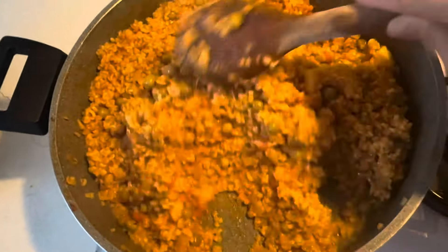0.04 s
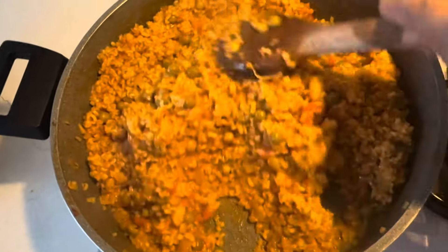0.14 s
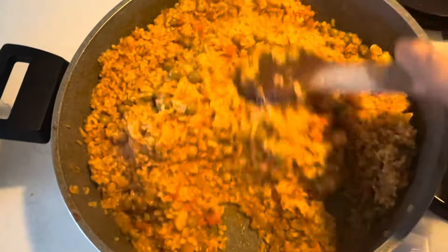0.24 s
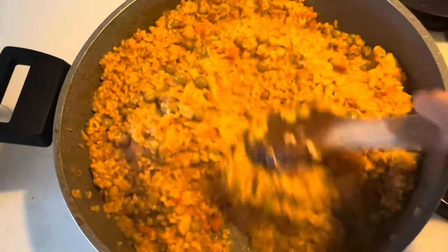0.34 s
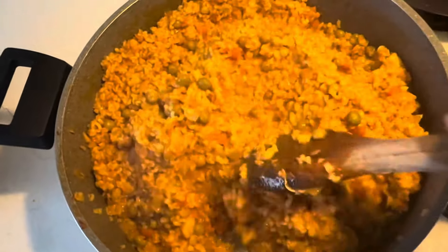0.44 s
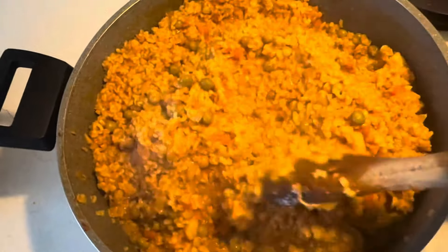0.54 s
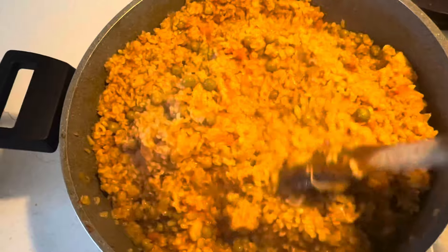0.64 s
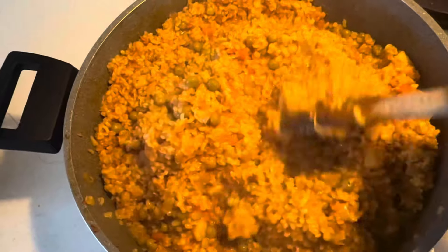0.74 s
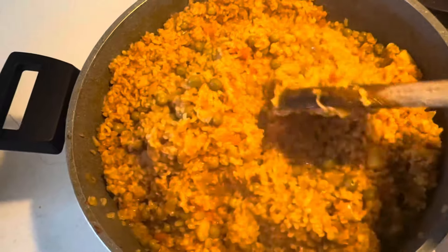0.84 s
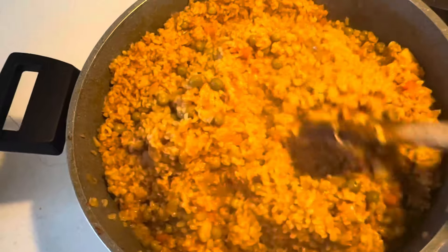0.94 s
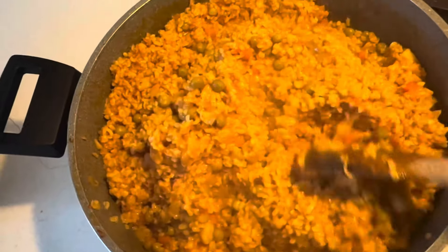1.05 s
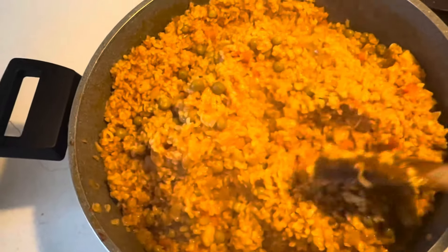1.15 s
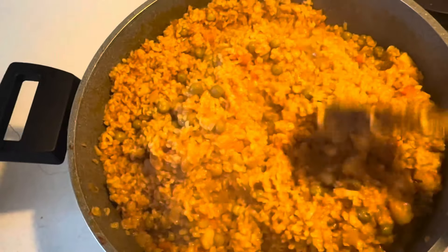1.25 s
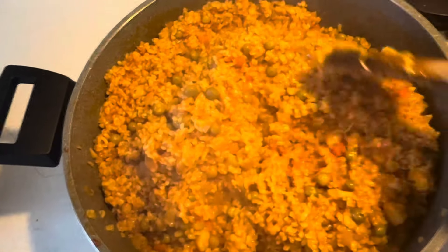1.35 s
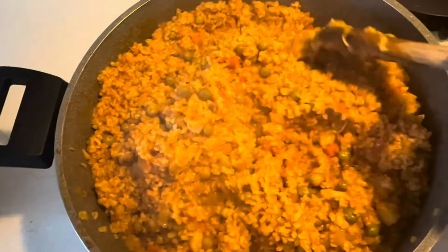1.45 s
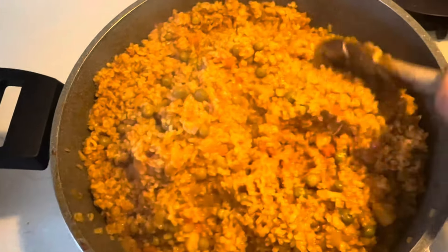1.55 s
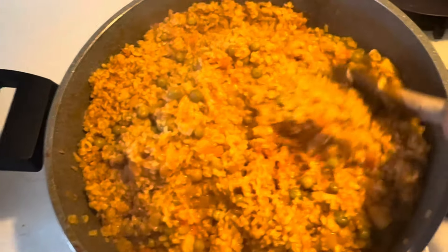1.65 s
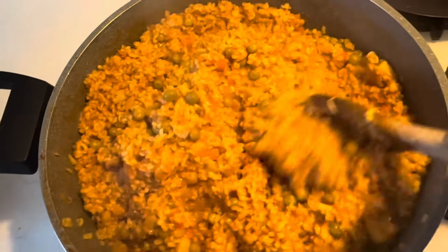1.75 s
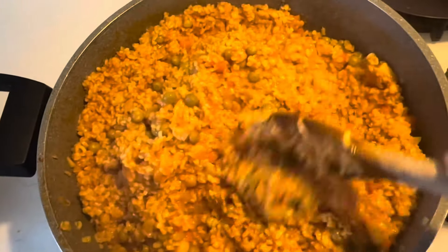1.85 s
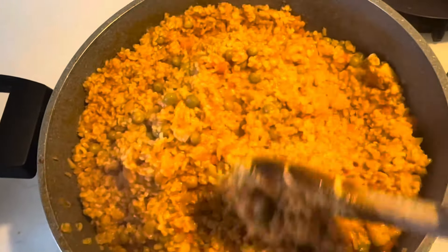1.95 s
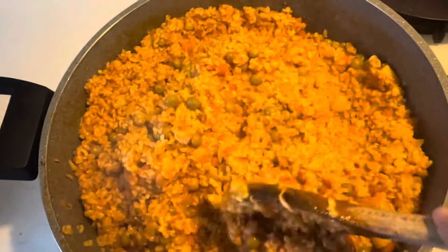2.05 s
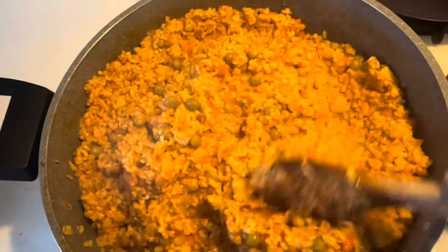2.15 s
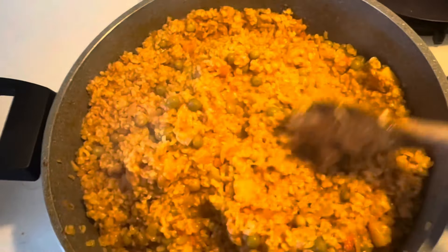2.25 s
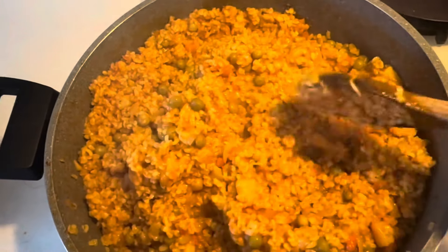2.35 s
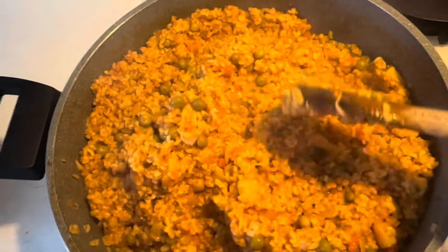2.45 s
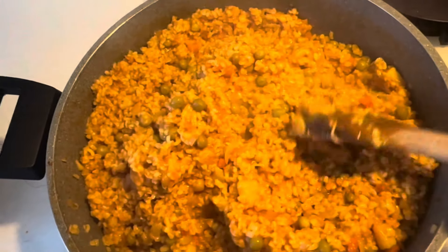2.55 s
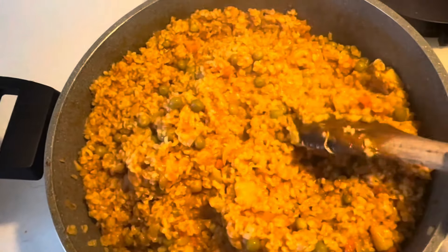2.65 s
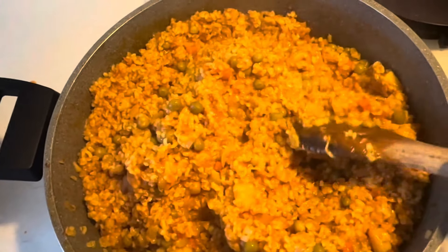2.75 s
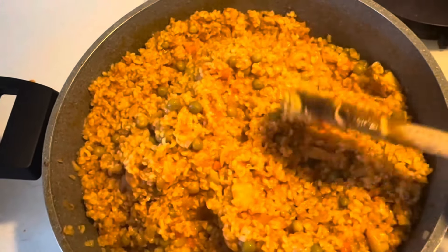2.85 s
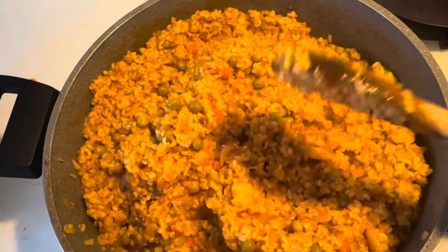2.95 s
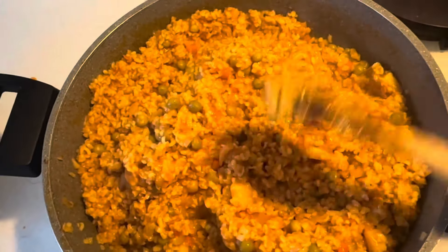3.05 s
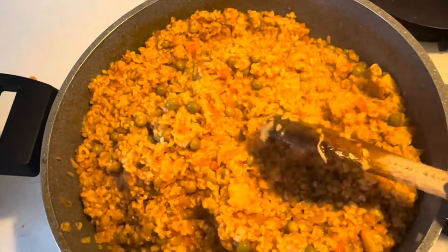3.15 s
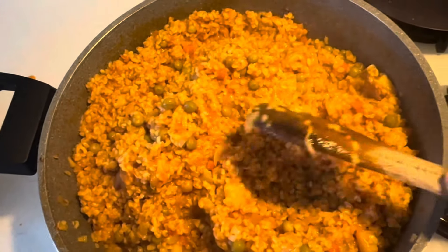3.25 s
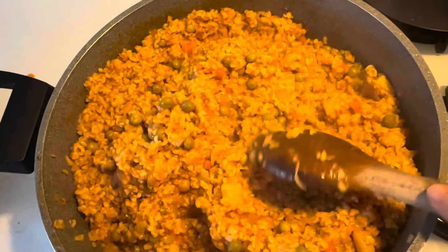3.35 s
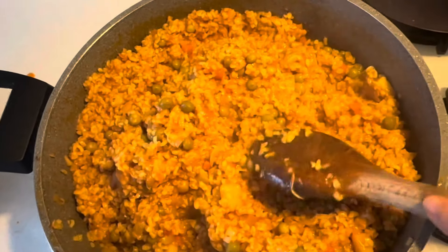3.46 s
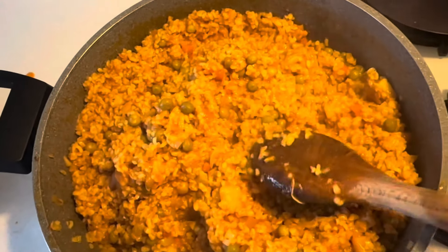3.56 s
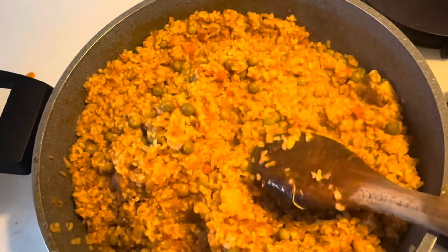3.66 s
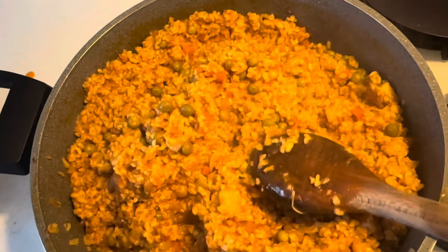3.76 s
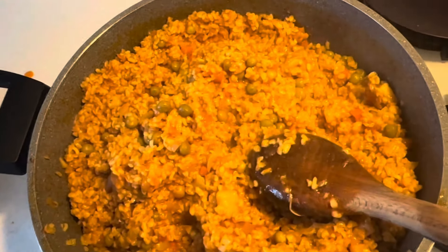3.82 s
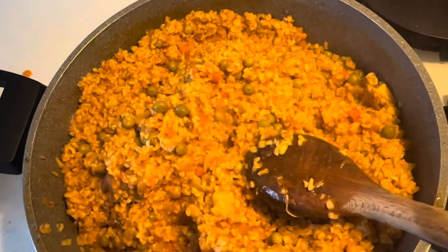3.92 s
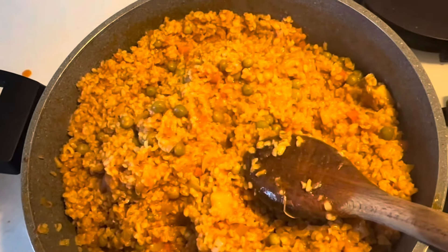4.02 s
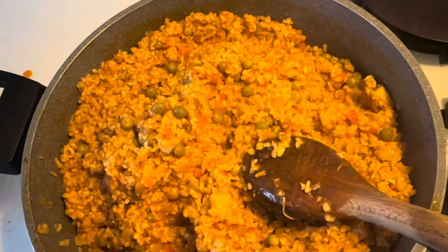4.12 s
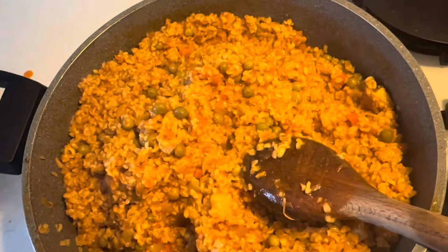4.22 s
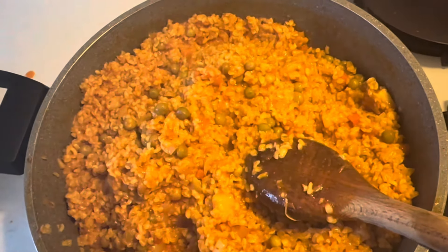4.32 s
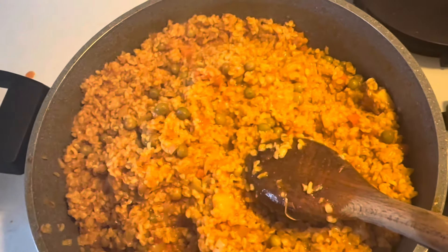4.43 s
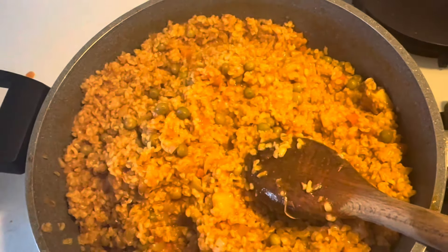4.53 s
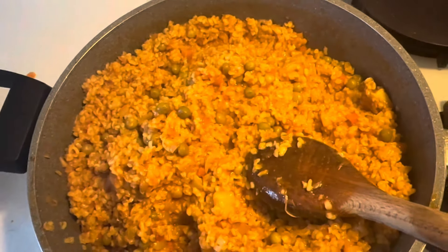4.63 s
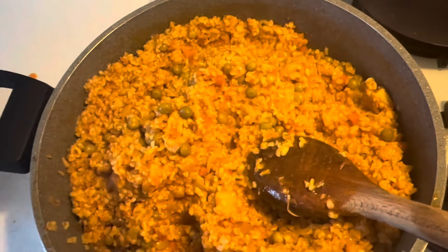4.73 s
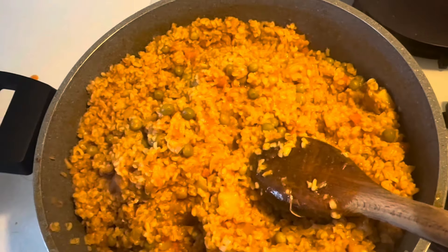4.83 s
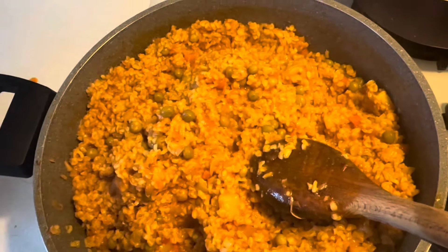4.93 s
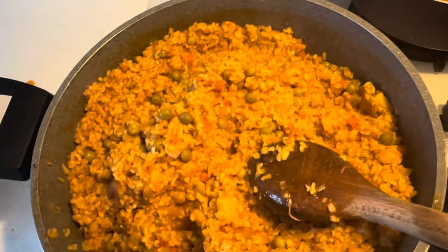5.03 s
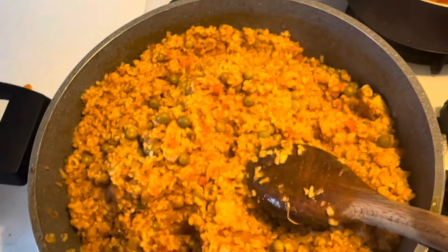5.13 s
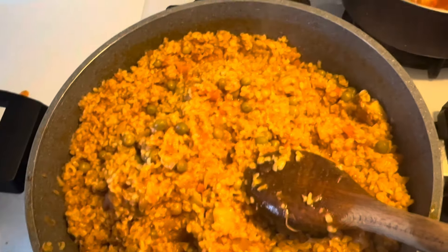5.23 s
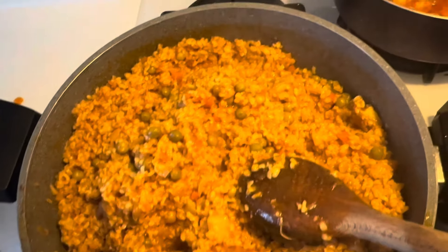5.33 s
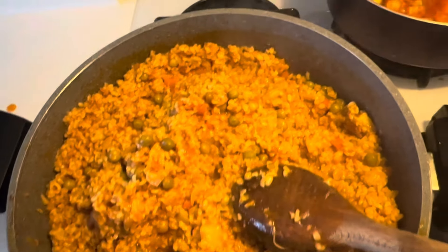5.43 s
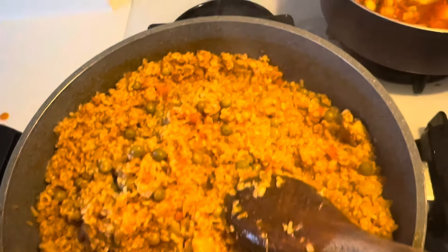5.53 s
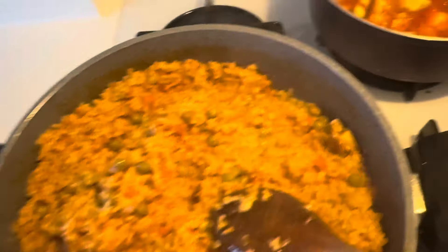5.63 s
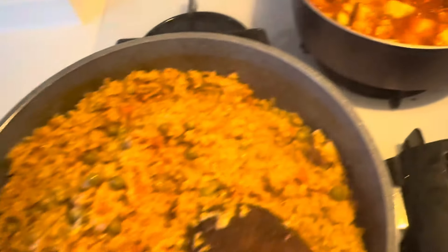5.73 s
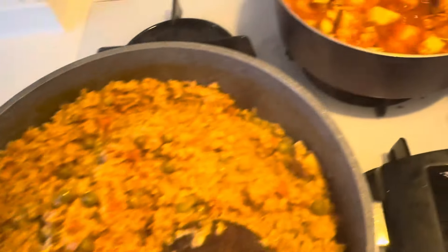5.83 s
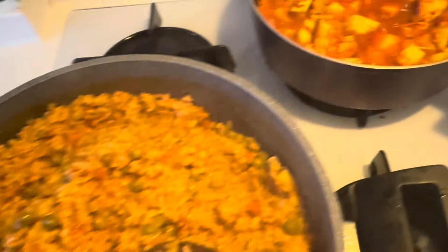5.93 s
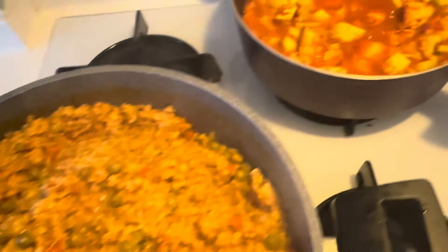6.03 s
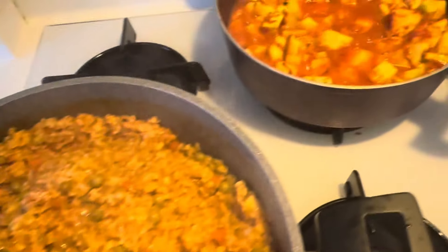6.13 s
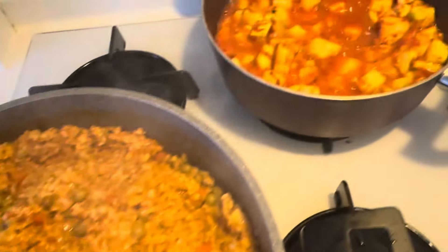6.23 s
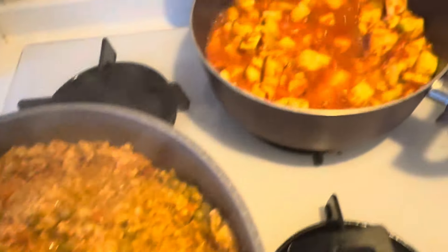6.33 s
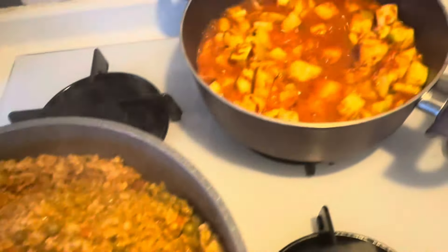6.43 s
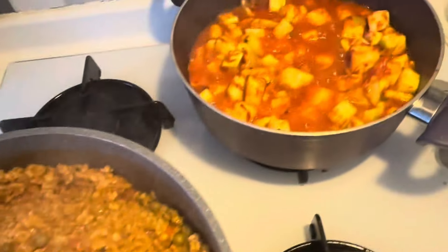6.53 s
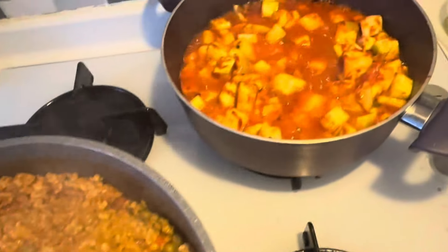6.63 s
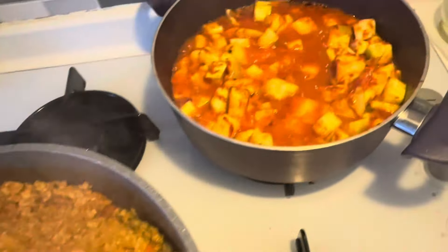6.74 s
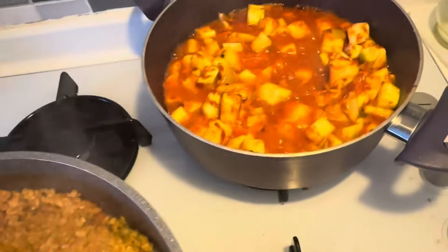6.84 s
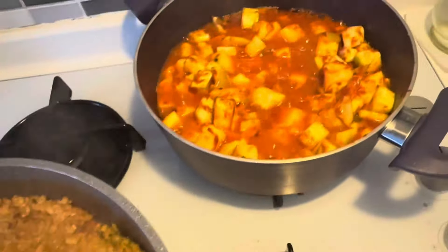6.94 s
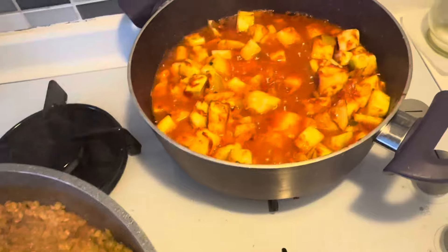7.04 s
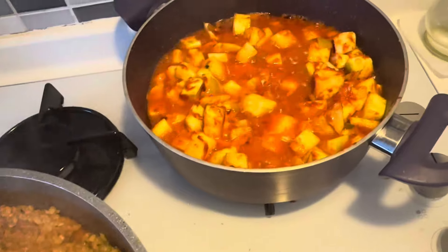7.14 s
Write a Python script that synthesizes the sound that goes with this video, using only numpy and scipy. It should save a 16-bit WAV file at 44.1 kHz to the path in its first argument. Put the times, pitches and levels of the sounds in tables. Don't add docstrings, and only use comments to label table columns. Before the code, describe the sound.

Steady airy sizzle and bubbling over a low burner rumble, with a few spoon knocks on the stove around three seconds, then thinner stew bubbling.

```python
import sys
import numpy as np
from scipy import signal
from scipy.fft import rfft, irfft, next_fast_len
from scipy.io import wavfile
from scipy.ndimage import uniform_filter1d, map_coordinates

SR = 44100
rng = np.random.default_rng(int(sys.argv[2]) if len(sys.argv) > 2 else 0)


def decibels_to_gain(level_db):
    exponent = np.asarray(level_db, float) / 20
    return 10 ** exponent


def dump(signal):
    limited = np.clip(np.atleast_2d(signal).T, -1, 1)
    pcm = np.round(limited * 32767).astype(np.int16)
    wavfile.write(sys.argv[1], SR, pcm)


N = 316638

# (frequency [Hz], width [Hz], level [dB])
POT_AIR = [(411, 130, -5), (606.7, 90, 1.5), (794.5, 48.6, 3.5), (1015.5, 48, 2.5), (1199, 166, -2),
           (1430, 142, 1), (2046, 240, -6.5), (2500, 315, -10.5)]
# (frequency [Hz], density [dB per Hz])
HISS_SPECTRUM = [(300, -27.5), (1200, -9.5), (2700, 4.5), (4200, 6.5), (5200, 3), (6700, 3.5), (7700, 1.5),
                 (8600, 6.5), (10000, -1), (11500, -23), (13000, -2.5), (14600, -1), (15800, -2)]


def unit(x):
    return x / np.sqrt(np.mean(x ** 2) + 1e-20)


def along(points, hz):
    f, v = np.transpose(points)
    return np.interp(np.log(hz + 1), np.log(f + 1), v)


def wobble(rate):
    knots = rng.standard_normal(int(N * rate / SR) + 4)
    return map_coordinates(knots, [np.arange(N) * rate / SR])


def filtered(x, response):
    m = next_fast_len(N + SR // 2)
    return irfft(rfft(x, m) * response(np.fft.rfftfreq(m, 1 / SR)), m)[..., :N]


def resonances(modes):
    def response(f):
        total = 0
        for k, (centre, width, db) in enumerate(modes):
            damping = 1j * f * width
            total = total + (-1) ** k * decibels_to_gain(db) * damping / (centre * centre - f * f + damping)
        return total
    return response


def patchy(depth_db):
    z = signal.stft(rng.standard_normal((2, N)), nperseg=512)[2]
    field = uniform_filter1d(rng.standard_normal(z.shape[1:]), 6, 0)
    field = uniform_filter1d(field, 10, 1)
    return signal.istft(z * decibels_to_gain(depth_db * unit(field)), nperseg=512)[1][:, :N]


def ports(pair):
    # (frequency [Hz], side minus mid [dB])
    side_level = [(60, -22.5), (200, -16.5), (400, -9.5), (700, -7), (1500, -1), (2100, -6.5), (4400, -4.5),
                  (7600, 0), (8600, -11.5), (10000, 3.5), (11500, 17.5), (13000, -4.5), (15500, -11)]
    # (frequency [Hz], share of the side that is a left lead [-])
    left_lead = [(60, 0.11), (900, -0.23), (1550, -1), (1900, -0.22), (2330, 0.35), (2800, 0.5),
                 (6700, 0.6), (9000, 0), (15000, 0)]

    def to_side(f):
        lean = np.clip(along(left_lead, f), -1, 1)
        return decibels_to_gain(along(side_level, f)) * [1j * lean, np.sqrt(1 - lean ** 2)]
    side = filtered(pair, to_side).sum(axis=0)
    return np.array([pair[0] + side, pair[0] - side])


def placed(db, pan_db):
    spread_db = 3.5
    pan = pan_db + spread_db * rng.standard_normal(len(db))
    return decibels_to_gain(db - 5.5 + np.outer([.5, -.5], pan))


def bubbles(s, gain, hz, t60):
    t = np.arange(SR // 20) / SR
    wave = np.sin(2 * np.pi * hz[:, None] * t * (1 + 3 * t))
    wave = wave * decibels_to_gain(-60 * t / t60[:, None]) * (1 - np.exp(-t / 0.00071))
    at = (s * SR).astype(int)[:, None] + np.arange(len(t))
    return np.array([np.bincount(at.ravel(), (g[:, None] * wave).ravel(), N + SR)[:N] for g in gain])


def fading(decays):
    hz, t, z = signal.stft(rng.standard_normal((2, SR // 2)), SR, nperseg=128)
    decay = decibels_to_gain(-60 * t / along(decays, hz)[:, None])
    tail = signal.istft(z * decay, SR, nperseg=128)[1][:, :SR // 2]
    return tail / np.linalg.norm(tail[0])


def kitchen(x):
    # (frequency [Hz], t60 [s])
    room_decay = [(100, 0.35), (500, 0.32), (2000, 0.47), (8000, 0.28), (15000, 0.073)]
    delayed = np.pad(x, (300, 0))
    return signal.fftconvolve(delayed[None], fading(room_decay), axes=1)[:, :N]


def heat():
    # (time [s], half length [s], flare [dB])
    stirs = [(0.0, 0.39, 4), (0.303, 0.067, 5.5), (0.65, 0.21, 2.5), (0.94, 0.069, 1.5), (1.723, 0.21, 3.5),
             (1.924, .08, 3.5), (2.212, 0.16, 2.5), (2.863, 0.16, 1.5), (3.9, 0.27, -1), (4.4, 0.6, 1),
             (5.0, 0.18, -1)]
    t = np.arange(N) / SR
    turn_s, turn_lasts_s, turn_gain_db = 5.3, 1, 3
    turn_db = turn_gain_db * np.sin(np.pi / 2 * np.clip((t - turn_s) / turn_lasts_s, 0, 1)) ** 2
    flare_db = turn_db + sum(db * np.exp(-((t - s) / half_s) ** 2) for s, half_s, db in stirs)
    rumble_db = -51 + 0.5 * turn_db
    simmer_db = -50.5 + 0.18 * flare_db
    steam_db = -57 + 0.46 * flare_db
    sizzle_db = -68.5 + flare_db
    return rumble_db, simmer_db, steam_db, sizzle_db


def flame_rumble():
    # (frequency [Hz], width [Hz], level [dB])
    drum = [(48, 16.7, -5.5), (69.6, 14, 0.5), (91.3, 25.3, -4.5), (116.4, 27.7, -4.5), (151.1, 4.1, -16),
            (244, 15, -18.5), (319, 70, -15.5), (227, 15, -52)]
    drone = np.sin(2 * np.pi * np.cumsum(66.5 + 8 * wobble(26)) / SR)
    return unit(filtered(patchy(0.98), resonances(drum))) + 1.05 * drone * [[1], [.3]]


def seething():
    u = rng.random((3500, 5))
    mid_and_side = np.array([1 + 0 * u[:, 4], 2 * u[:, 4] - 1])
    size = decibels_to_gain(np.minimum(-4 * np.log(u[:, 1]), 12)) * mid_and_side
    pitch_hz = 800 * 3.08 ** u[:, 2]
    return unit(bubbles(u[:, 0] * N / SR, size, pitch_hz, (5 + 12 * u[:, 3]) / pitch_hz))


def gas_hiss():
    # (frequency [Hz], width [Hz], level [dB])
    jets = [(4265, 11, 7), (1964, 59, 8.5)]
    spits = 1 + 4 * (rng.random(N) < .003 * decibels_to_gain(7 * wobble(20)))
    ripple = rng.standard_normal(SR // 60)

    def colour(f):
        comb_db = 1.5 * map_coordinates(ripple, [f / 35])
        singing = np.abs(1 + resonances([jets[0]])(f) + resonances([jets[1]])(f))
        return decibels_to_gain(along(HISS_SPECTRUM, f) + comb_db) * singing
    return unit(filtered(spits * patchy(1.0), colour))


def stove():
    rumble_db, simmer_db, steam_db, sizzle_db = heat()
    flicker = wobble(9.8)
    rumble = decibels_to_gain(rumble_db + 5.0 + 0.15 * wobble(4.5)) * flame_rumble()
    murmur = unit(filtered(patchy(0.78), resonances(POT_AIR)))
    boil = decibels_to_gain(.5 * (simmer_db - simmer_db.mean()) + 1.9 * wobble(11))
    simmer = decibels_to_gain(simmer_db - 1.5 + 0.26 * flicker) * (murmur + 0.36 * boil * seething())
    hiss = gas_hiss()
    steam = filtered(hiss, lambda f: 1 / (1 + (f / 8500) ** 6))
    sizzle = hiss - steam
    shared = 0.61 * flicker + 0.43 * wobble(14)
    high = decibels_to_gain(steam_db + 2.5 + shared) * steam
    high = high + decibels_to_gain(sizzle_db + 12.5 + shared + 1.0 * wobble(8.7)) * sizzle
    return rumble + simmer + high


def stew():
    # (time [s], level [dB])
    stew_level = [
        (5.7, -54.5),
        (6.486, -51.5),
        (6.696, -55),
        (7.18, -51),
    ]
    s, db = np.transpose(stew_level)
    boil_db = np.interp(np.arange(N) / SR, s, db, left=-70)
    u = rng.random((750, 5))
    mid_and_side = np.array([1 + 0 * u[:, 4], 2 * u[:, 4] - 1])
    size = decibels_to_gain(np.minimum(-5.5 * np.log(u[:, 1]), 11)) * mid_and_side
    pitch_hz = 900 * 2.6 ** u[:, 2]
    froth = bubbles(s[0] + u[:, 0] * (s[-1] - s[0]), size, pitch_hz, (3 + 10 * u[:, 3]) / pitch_hz)
    level = decibels_to_gain(boil_db - 12.5 + 0.52 * (boil_db - db.mean()))
    return level * decibels_to_gain(3 * wobble(12)) * unit(froth)


def ticks():
    # (time [s], peak level [dB])
    fat_spits = [(0.1846, -40.5), (0.327, -42), (0.7198, -38.5), (0.812, -42.5), (0.919, -41), (1.237, -41),
                 (1.277, -46), (1.5492, -40), (1.6147, -43), (1.641, -40), (2.1923, -43), (2.466, -43),
                 (2.654, -42.5), (2.7447, -40.5), (3.0253, -41.5), (3.6092, -47), (3.8624, -48),
                 (3.899, -45), (3.9524, -39.5), (4.0883, -42), (4.14, -42.5), (4.3273, -45), (4.371, -41),
                 (4.4294, -56), (4.461, -51), (4.751, -40), (5.082, -41.5), (5.121, -45), (5.154, -41),
                 (6.0204, -38.5), (6.2417, -41), (6.2955, -38), (6.352, -40), (6.4173, -39.5),
                 (6.5575, -48), (6.634, -40), (6.961, -38), (7.0346, -39.5)]
    s, db = np.transpose(fat_spits)
    burst = bubbles(s, placed(db - 7.5, 0.5), 60 + 0 * s, 0.018 + 0 * s)
    noise = rng.standard_normal((2, N))
    treble = filtered(noise, lambda f: decibels_to_gain(along(HISS_SPECTRUM, f)) * (f > 1500))
    return 6 * burst * ports(unit(treble))


def crackles():
    # (time [s], peak level [dB], frequency [Hz])
    droplets = [(0.3905, -42, 2460), (0.631, -37, 4220), (0.7203, -41, 4400), (1.641, -41, 4330),
                (1.7574, -36, 2200), (1.9756, -37.5, 3800), (2.089, -36.5, 3500), (2.191, -40, 4000),
                (2.5855, -38, 3070), (2.564, -36, 2020), (3.028, -43, 4100), (3.4214, -46, 6650),
                (3.617, -36.5, 3210), (3.7833, -36, 3070), (3.899, -43, 3960), (4.089, -41, 3850),
                (4.139, -38, 2130), (4.368, -48, 4140), (4.97, -33, 2740), (4.974, -45, 3200),
                (5.063, -37, 2150), (5.081, -40, 4000), (5.315, -37, 3030), (5.4228, -39.5, 4600),
                (5.523, -33.5, 2150), (6.0023, -44, 2730), (6.35, -41, 2560), (6.491, -32.5, 2470),
                (6.6823, -35, 2570), (6.903, -35.5, 2150), (7.107, -41, 2130)]
    s, db, hz = np.transpose(droplets)
    gain = placed(db, 6.5)
    vapour = ports(filtered(rng.standard_normal((2, N)), lambda f: decibels_to_gain(along(HISS_SPECTRUM, f))))
    puff = bubbles(s, gain * (hz / 4200) ** 1.9, 25 + 0 * hz, 0.022 + 0 * hz) * vapour
    return 1.5 * bubbles(s, gain, hz, 32 / hz) + 2 * puff


def plops():
    # (time [s], peak level
    # [dB], frequency [Hz])
    wet_bursts = [(5.8901, -44, 1910), (5.9046, -42, 1940), (6.191, -41, 1630), (6.2523, -47, 2100),
                  (6.325, -38, 1670), (6.427, -41, 1640), (6.4586, -41, 1610), (6.4917, -40, 2270),
                  (6.5716, -50, 2120), (6.684, -46, 2420), (6.6836, -42, 1760), (6.717, -38.5, 1600),
                  (6.83, -37, 1700), (6.9043, -42, 2070), (6.9442, -35, 1700), (7.0053, -41, 1620),
                  (7.1079, -47, 2100), (7.1383, -42, 1710),
                  (3.2792, -39, 1480), (3.781, -41.5, 377), (3.708, -42, 1200), (4.753, -43, 1030),
                    (2.586, -43, 3100), (3.332, -40, 2220), (4.737, -39.5, 750), (6.328, -37.5, 1840),
                    (6.469, -38, 1290), (6.941, -37, 1840), (6.946, -41, 1400)]
    s, db, hz = np.transpose(wet_bursts)
    left_right_db = np.array([[1], [-1]])
    return bubbles(s, decibels_to_gain(db + 2.5 + left_right_db), hz, 21 / hz)


def pops():
    # (time [s], peak level
    # [dB], frequency [Hz], t60 [ms])
    short_rings = [(0.272, -33, 1145, 56), (1.154, -35, 1250, 26), (1.417, -29, 1400, 55),
                   (1.473, -44, 1430, 20), (1.562, -34, 1290, 24), (1.943, -33, 1470, 50),
                   (2.545, -32.5, 1510, 38), (2.563, -27, 560, 8.1), (2.843, -32, 1020, 29),
                   (3.279, -28, 1470, 25), (3.709, -28, 787, 23), (3.79, -35, 780, 24),
                   (4.735, -25, 650, 15), (4.746, -25, 697, 25), (4.846, -34, 1260, 30),
                   (5.198, -32.5, 1260, 18), (5.316, -30.5, 795, 27), (5.492, -32, 1430, 60),
                   (5.902, -29, 1530, 22), (6.035, -28, 1270, 12), (6.324, -29, 1430, 13),
                   (6.342, -25, 1270, 15), (6.428, -34, 1430, 43), (6.457, -29.5, 1530, 35),
                   (6.545, -20, 1180, 5.7), (6.681, -30, 1570, 18), (6.702, -23, 965, 8.6),
                   (6.717, -25.5, 1290, 9.3), (6.926, -30, 1210, 14), (6.944, -26.5, 1430, 20),
                   (0.238, -32, 1470, 20), (0.356, -30.5, 1280, 17), (0.727, -38, 1460, 18),
                   (1.527, -37, 1280, 18), (2.442, -28.5, 1176, 23), (3.332, -19.5, 974, 39),
                   (3.94, -30.5, 1180, 17), (4.061, -33, 1000, 22), (4.234, -32, 1430, 41),
                   (4.45, -32.5, 1390, 43), (4.666, -30, 1420, 23), (5.139, -32, 1430, 20),
                   (6.097, -34, 1450, 22), (6.469, -29, 1385, 22), (6.572, -37, 1370, 24),
                   (6.6, -29, 1430, 21), (6.659, -29, 1050, 17), (6.763, -35, 1380, 16),
                   (6.996, -33, 1400, 18), (7.103, -36, 1500, 20)]
    s, db, hz, t60_ms = np.transpose(short_rings)
    gain = placed(db, -0.5)
    click = filtered(bubbles(s, gain, 1800 + 0 * hz, 0.0024 + 0 * hz), resonances(POT_AIR))
    return bubbles(s, gain, hz, t60_ms * 0.00085) + 6.6 * click


def ring(modes, t, lag, hard_hz):
    out = 0
    for hz, db, t60, blur_hz in modes:
        late = np.maximum(t - lag / np.sqrt(hz), 0)
        wander = np.cumsum((late > 0) * rng.standard_normal(len(t))) * np.sqrt(2 * np.pi * blur_hz / SR)
        size = decibels_to_gain(db + rng.normal(0, 2.2) - 60 * late / t60)
        size = size / np.sqrt(1 + (hz / hard_hz) ** 4)
        onset = 1 - np.exp(-late / (0.4 / hz + 0.0012))
        out = out + size * np.sin(2 * np.pi * hz * late + wander) * onset
    return out


def spoon():
    # (time [s], blow [dB], hardness [Hz], tick of the wood [Hz], tick level [dB])
    bumps = [
        (2.5576, -24, 400, 350, 4.5),
        (2.581, -39, 1510, 663, 15),
        (3.063, -5, 2500, 1512, -1.5),
        (3.0677, -15.5, 402, 372, 19.5),
        (3.092, -16, 1510, 515, -1),
        (3.327, -18, 330, 1395, -10.5),
        (3.355, -38, 1200, 618, 8),
        (3.064, -10.5, 169, 450, -6),
        (3.137, -28.5, 700, 500, 0),
        (3.3316, -36, 151, 342, 21.5),
    ]
    # (frequency [Hz], level [dB], t60 [s], blur [Hz])
    sheet = [(60.6, 4.5, 0.17, 3.8), (98, 4.5, 0.047, 2), (104, -3, 0.089, 0.24), (117.75, 8, 0.26, 0.32),
             (144, -3.5, 0.2, 1.8), (182, -27, 0.27, 8.8), (256.7, -5, 0.24, 6.5), (295, -14, 0.12, 13),
             (346, 1, 0.05, 22), (393, -5, 0.028, 22), (461, -3, 0.073, 40), (560, -7.5, 0.074, 42),
             (599, -15.5, 0.25, 6.6), (728, -13.5, 0.15, 23), (907, -15, 0.11, 12), (1033, -7, 0.06, 42),
             (1310, -15.5, 0.1, 48), (1518, -21, 0.05, 120), (1837, -15.5, 0.08, 60),
             (2270, -8.5, 0.051, 90)]
    # (time [s], level [dB], hardness [Hz])
    rattles = [(2.585, -32, 3600), (3.07, -22, 9000), (3.077, -9, 14700), (3.087, -22, 9000),
               (3.096, -14, 6300), (3.11, -33.5, 6000), (3.12, -29, 6000), (3.135, -35, 5950),
               (3.33, -46, 2500), (3.36, -36.5, 4020), (3.436, -43, 4100)]
    # (frequency [Hz], level [dB], t60 [s], blur [Hz])
    grate = [(3000, -13.5, 0.045, 400), (4390, -14, 0.04, 340), (5340, -14, 0.035, 640),
             (6830, -11, 0.033, 440), (8802, -20.5, 0.19, 120), (9670, -12.5, 0.036, 480),
             (13350, -15, 0.092, 60), (13810, -29, .06, 60), (14404, -14.5, 0.32, 2)]
    # (frequency [Hz], t60 [s])
    loose_decay = [(150, 0.35), (600, 0.18), (2000, 0.13), (6000, 0.14), (12000, 0.11)]
    # (frequency [Hz], density [dB per Hz])
    loose_spectrum = [(30, -55), (70, -26.5), (200, -12.5), (290, -2), (450, -7), (900, -3), (1500, -9.5),
                      (2300, -15), (5300, -24), (8000, -28), (15000, -51)]
    # (frequency [Hz], left minus right [dB])
    blow_tilt = [(60, 1), (120, -0.5), (300, -7), (700, 3.5), (1300, -4.5), (3000, 5.5), (8000, 0.5),
                 (14000, -1)]
    out, loose = np.zeros((2, N + SR)), np.zeros((2, N + SR))
    t = np.arange(SR // 2) / SR
    for s, db, hard_hz, tick_hz, tick_db in bumps:
        bell = ((t - .006) / (0.00054 + 0.31 / tick_hz)) ** 2
        tick = decibels_to_gain(tick_db - 10 * np.log10(np.e) * bell) * np.sin(2 * np.pi * tick_hz * t)
        blow = np.array([ring(sheet, t, .13, hard_hz), 0.59 * ring(sheet, t, 0.097, hard_hz)])
        out[:, round(s * SR):][:, :len(t)] += decibels_to_gain(db - 6.0) * (blow + tick)
        loose_db = db - 7 + 15 * hard_hz * 1e-3
        loose[:, round((s + .007) * SR):][:, :len(t)] += decibels_to_gain(loose_db) * fading(loose_decay)
    for s, db, hard_hz in rattles:
        b, a = signal.butter(2, min(hard_hz, 7000), fs=SR)
        contact = signal.lfilter(b, a, rng.standard_normal((2, len(t))))
        crack = (2.1 * decibels_to_gain(-60 * t / 0.0014) + 0.36 * decibels_to_gain(-60 * t / 0.014)) * contact
        bars = np.array([ring(grate, t, 0, hard_hz), 0.58 * ring(grate, t, 0, hard_hz)])
        out[:, round(s * SR):][:, :len(t)] += decibels_to_gain(db) * (bars + crack)
    debris = filtered(loose[:, :N], lambda f: decibels_to_gain(along(loose_spectrum, f)))
    blows = ports(out[:, :N] + debris)
    return filtered(blows, lambda f: decibels_to_gain(np.outer([.5, -.5], along(blow_tilt, f))))


def scene():
    near = spoon() + pops() + crackles() + ticks() + plops()
    return near + ports(decibels_to_gain(-16.5) * kitchen(near.mean(axis=0)) + stove() + stew())


def starve(x):
    # (mid 0 or side 1, from [Hz], to [Hz], level over its median a frame needs to survive [dB])
    starved = [(0, 10330, 11750, 99), (0, 11750, 12400, 2.8), (1, 8250, 8900, -.4), (1, 11200, 11700, -1),
               (1, 13250, 13800, .8), (1, 13800, 15150, 33), (1, 15150, 15780, .2), (0, 15780, 23000, 99),
               (1, 15780, 23000, 99)]
    # (frequency [Hz], step over band rms [dB])
    coarseness = [(300, -20), (800, -10), (1300, -4), (1900, 0), (2600, 1.5), (11000, 1.5), (16000, 2.5)]
    quick_s = [2.2, 4.1, 6.355]
    sudden_s = [3.058, 3.081]
    size, grid = 1024, 719
    k = np.arange(size)
    rise = np.cumsum(np.kaiser(size + 1, 4 * np.pi))
    slopes = np.array([np.sin(np.pi / 2 * (k + .5) / size), np.sqrt(rise[:-1] / rise[-1])])
    mid_side = np.array([x[0] + x[1], x[0] - x[1]]) / 2
    pair = np.pad(mid_side, ((0, 0), (2 * size - grid, 2 * size)))
    frames = np.lib.stride_tricks.sliding_window_view(pair, 2 * size, axis=1)[:, ::size]
    count = frames.shape[1]
    steep = (uniform_filter1d(rng.standard_normal(count + 1), size=2) > .17).astype(int)
    window = np.hstack([slopes[steep[:-1]], slopes[steep[1:], ::-1]])
    basis = np.cos(np.pi / size * np.outer(np.arange(2 * size) + .5 + size / 2, k + .5))
    z = frames * window @ basis
    hz = (k + .5) * SR / 2 / size
    s = (grid + size * (np.arange(count) - 1)) / SR

    def near(times):
        return np.abs(s[:, None] - times).min(axis=1) < size / SR / 2

    for ch, lo, hi, keep_db in starved:
        band = (hz >= lo) & (hz < hi)
        level = np.sqrt(np.mean(z[ch][:, band] ** 2, axis=1))
        survives = (level > decibels_to_gain(keep_db) * np.median(level)) | near(quick_s) & (hi < 15800)
        z[ch][:, band] *= survives[:, None]
    loud = np.abs(z[0][:, hz < 2000]).max(axis=1)
    masked = loud > decibels_to_gain(21) * np.median(loud)
    z[..., ((hz > 11750) & (hz < 12400)) | (hz > 14900)] *= ~masked[:, None]
    rms = np.sqrt(np.mean(z.reshape(2, count, -1, 32) ** 2, axis=3).max(axis=0)).repeat(32, axis=1)
    step_db = along(coarseness, hz) - 30 * near(quick_s + sudden_s)[:, None]
    step = rms * decibels_to_gain(step_db + 5 * np.outer(masked, hz > 10000)) + 1e-12
    z = np.sign(z) * step * np.floor(np.abs(z / step) ** .75 + .4054) ** (4 / 3)
    back = z @ basis.T * window * 2 / size
    joined = (back[:, 1:, :size] + back[:, :-1, size:]).reshape(2, -1)
    mid, side = joined[:, size - grid:][:, :N]
    return np.array([mid + side, mid - side])


def roll_off(x):
    return signal.sosfilt(signal.butter(12, 16790, fs=SR, output="sos"), x)


def record(dry):
    x = filtered(dry, lambda f: (1j * f / (41 + 1j * f)) ** 4)
    rounded = x / (1 + np.abs(x / 0.72) ** 6) ** (1 / 6)
    mix = starve(rounded)
    return roll_off(mix)


dry = scene()
out = record(dry)
dump(out)
```